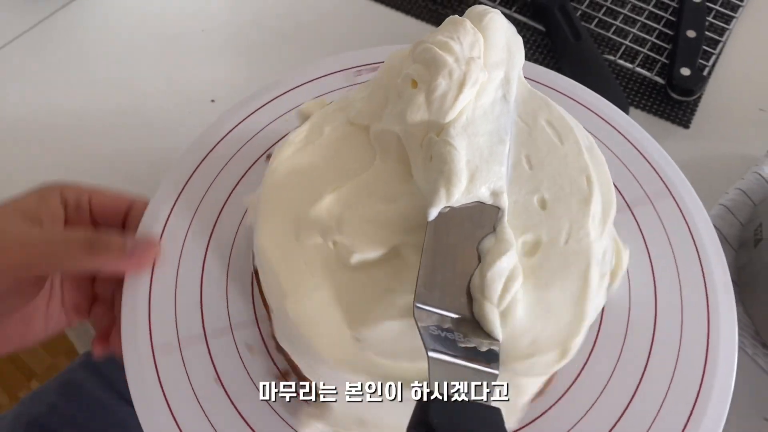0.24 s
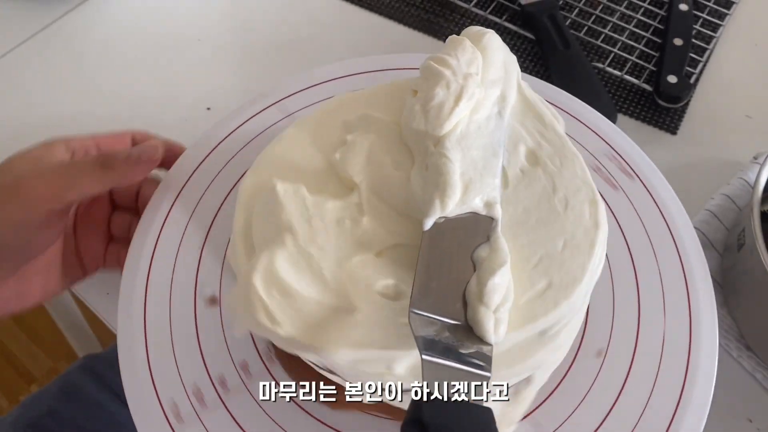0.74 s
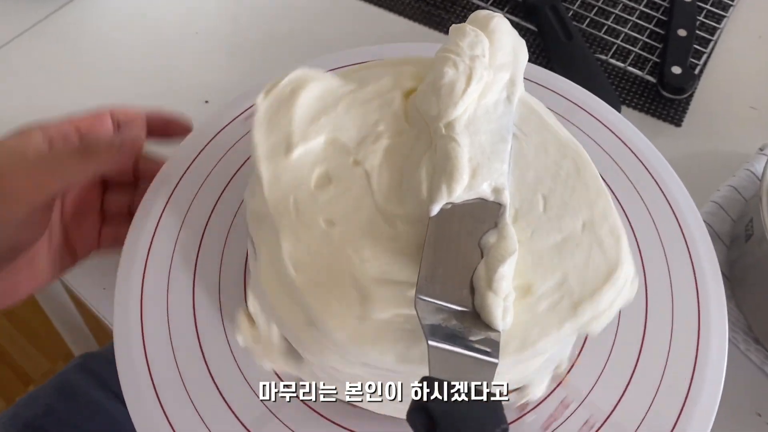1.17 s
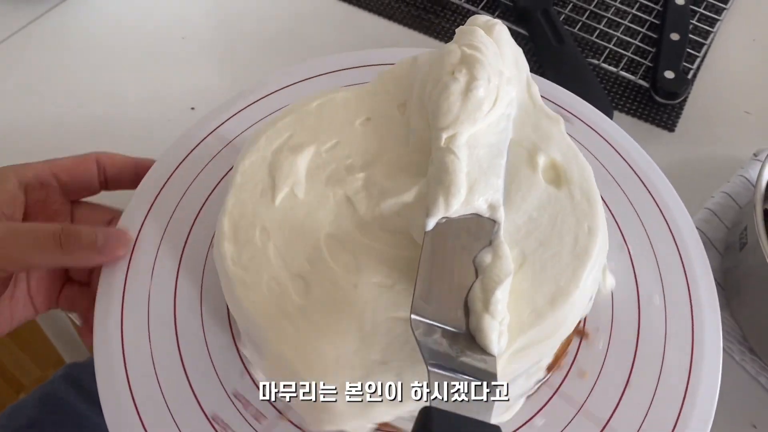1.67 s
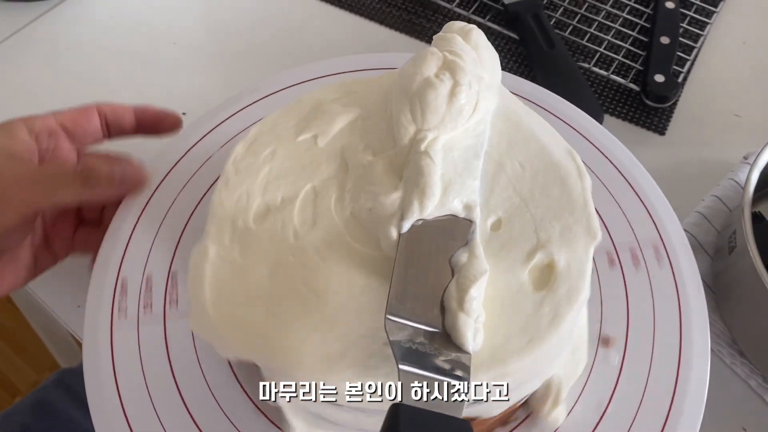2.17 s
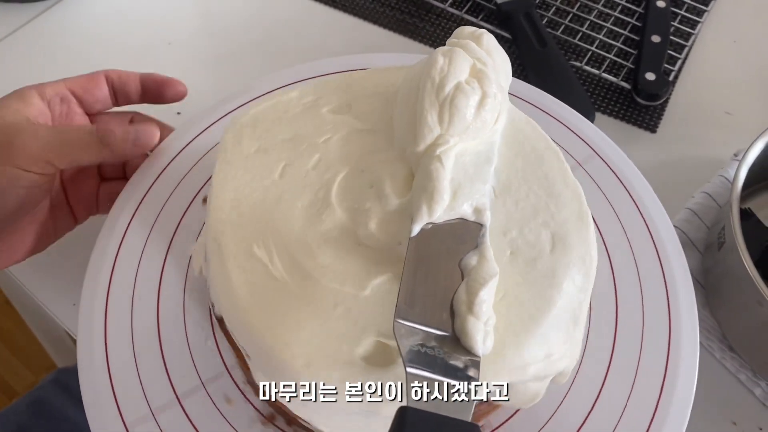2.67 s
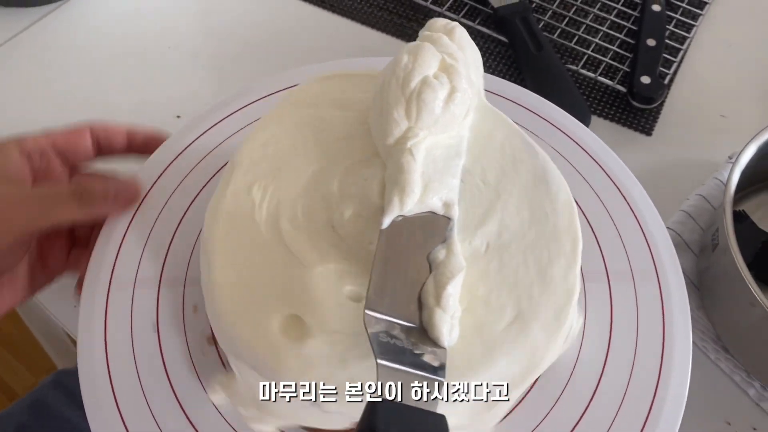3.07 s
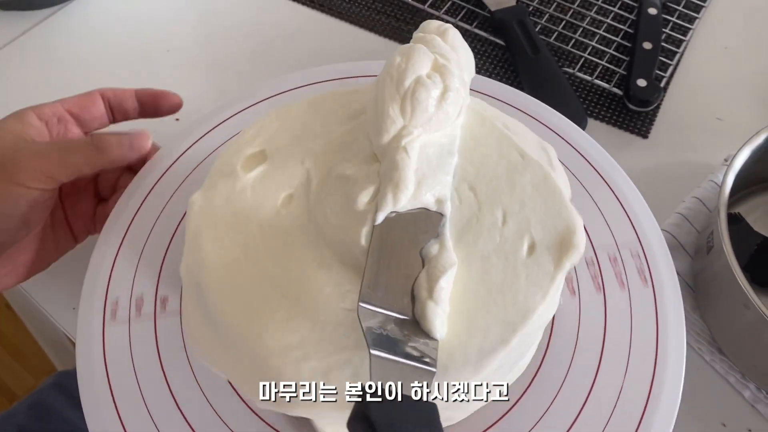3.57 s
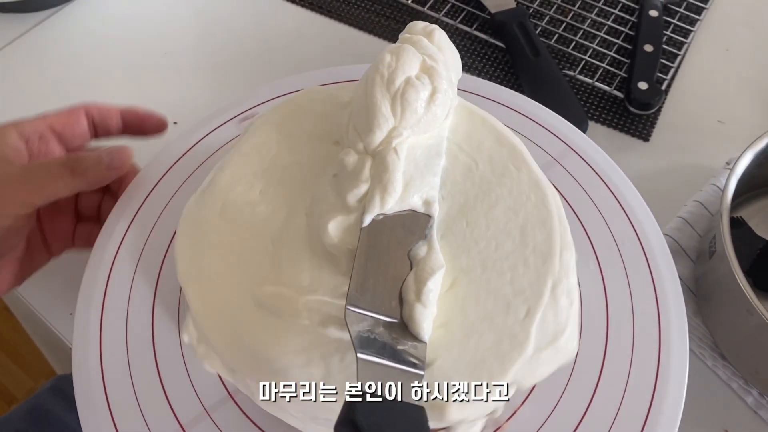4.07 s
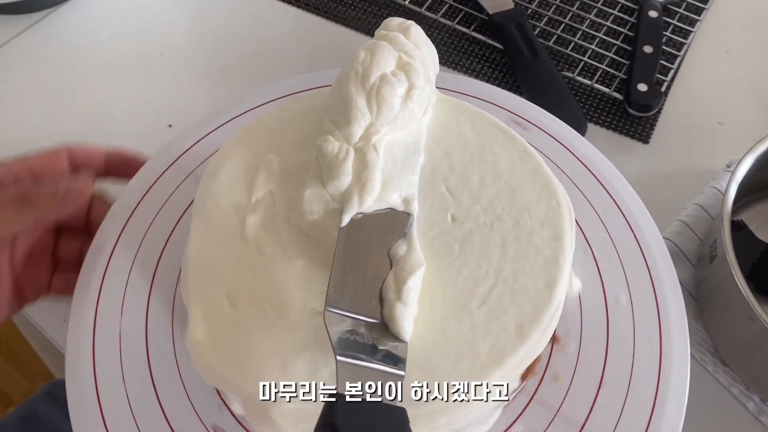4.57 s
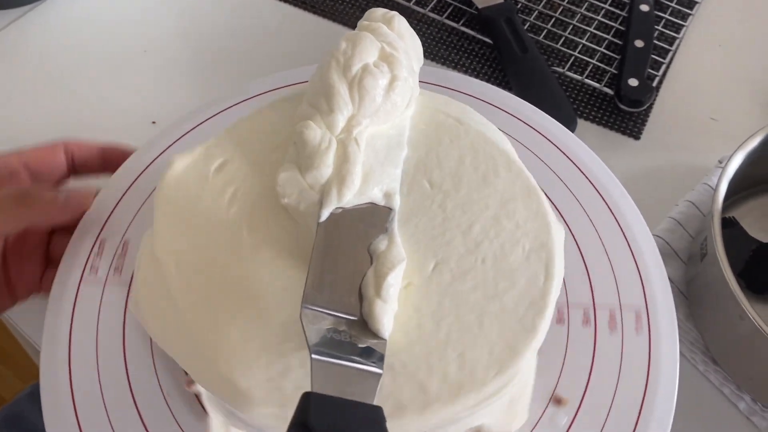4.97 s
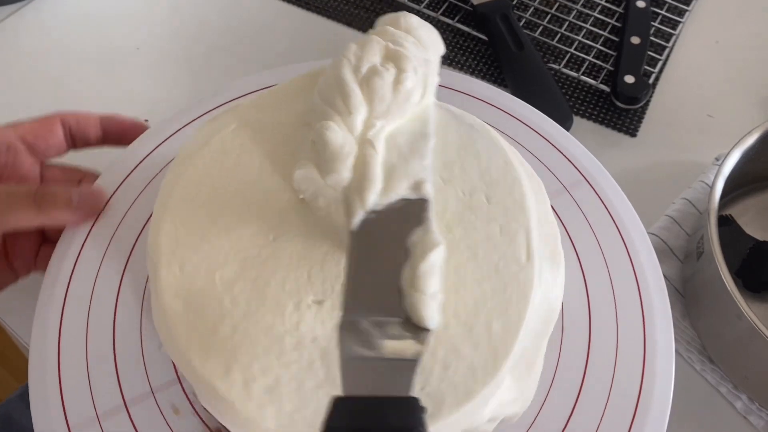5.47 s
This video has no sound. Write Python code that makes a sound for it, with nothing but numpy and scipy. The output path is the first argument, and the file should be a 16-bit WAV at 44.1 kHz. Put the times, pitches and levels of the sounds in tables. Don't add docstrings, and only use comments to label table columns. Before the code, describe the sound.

Wet cream rushes past a blade, then irregular light plastic knocks, nail clicks and dry rubbing as a cake stand is nudged round.

```python
import sys
import numpy as np
from scipy import signal
from scipy.fft import rfft, irfft, next_fast_len
from scipy.io import wavfile
from scipy.ndimage import uniform_filter1d, map_coordinates

SR = 44100
rng = np.random.default_rng(int(sys.argv[2]) if len(sys.argv) > 2 else 0)


def pcm_store(signal):
    levels = np.round(np.clip(np.atleast_2d(signal), -1, 1) * 32767)
    wavfile.write(sys.argv[1], SR, levels.astype(np.int16).T)


def volts(x):
    e = np.asarray(x, float) / 20
    return 10 ** e


N = 253134
STEP = 32
LAND_DB_PER_S, LIFT_DB_PER_S = 2510, 446.5

# pitch_hz, level_db, t60_s (time to die by 60 dB)
PLATTER_MODES = [(384, 0, .08), (454, 0, .08), (497, -3, .04)]
COUNTER_MODES = [(132.6, -2.5, 0.13), (175.3, 10.5, 0.051), (202.3, 5, 0.083), (263.2, 3.5, 0.046)]
RIM_MODES = [(743.4, -9, 0.076), (921, -4, 0.07), (1040, -3, 0.1), (1184, 3.5, 0.077), (1414, -7.5, 0.021),
             (1290, -11, .06)]
SHELL_MODES = [(1548, 4, 0.044), (1575, 1, 0.02), (1897, -3, .035), (2516, 3, 0.017), (3103, -7.5, 0.025),
               (3820, -13.5, 0.037), (4955, -10.5, 0.034)]
PAD_MODES = [(1068, -11, .07), (1420, -7, 0.11), (1870, -1, 0.057), (2390, -6, 0.06), (2970, 3.5, 0.059),
             (3480, -10, .05), (4460, -17, .04), (5028, -7, .06)]

# pitch_hz, level_db (per Hz)
TICK_COLOUR = [(200, -35), (650, 1.5), (1800, -9.5), (3000, -5), (4500, -7.5), (6000, -16), (8000, -15.5),
               (11000, -43)]
SKIN_COLOUR = [(2000, -10.5), (5000, -7.5), (8000, -7), (9000, -4.5), (10400, -2), (13500, -8.5),
               (15200, -9.5), (15700, -23)]
DRAG_COLOUR = [(500, -5), (1000, 17), (2000, 11), (3000, 5), (5200, -3), (6000, -9.5), (7500, -13),
               (9000, -55.5)]
HUM_COLOUR = [(25, -38), (38, -5), (50, 2), (70, -2), (100, -17.5), (200, -40.5), (700, -100)]
AIR_COLOUR = [(180, -17), (300, -5.5), (700, -10.5), (1600, -19), (3500, -23.5), (10500, -28),
              (11500, -38.5), (13000, -47), (15500, -53.5)]
RATTLE_COLOUR = [(250, -35), (550, -6), (800, -2.5), (1300, 0), (2500, -14.5), (5100, -22), (5900, -18),
                 (12000, -35.5)]
RIDGE_COLOUR = [(11200, -30.5), (11900, -2.5), (13800, 1), (15200, -3.5), (15600, -35)]
BUZZ_COLOUR = [(900, -29.5), (1500, 0), (2500, -1.5), (3500, -2), (5200, -4.5), (5600, -20), (7500, -30),
               (9000, -59.5)]

# pitch_hz, width_hz, level_db
BLADE_BANDS = [(1970, 330, 3.5), (1100, 300, -6), (4120, 980, -15)]
EDGE_BANDS = [(2072, 49, 0)]
MURMUR_BANDS = [(128, 35, -1), (173, 35, 2.5), (184.4, 46, 4), (246, 230, -10)]
BODY_BANDS = [(745, 33, 6.5), (973, 150, 10), (1195, 19, 5.5), (1448, 90, 3), (1980, 290, 9),
              (2440, 110, 1.5), (3119, 97, 9), (5000, 500, 0.5)]
SHELL_BANDS = [(1650, 120, 6), (2446, 90, 4.5), (2872, 90, 5), (3466, 80, 9.5), (4140, 110, 4.5),
               (4984, 120, 9)]

# pitch_hz, likeness (0 to 1)
ALIKE = [(30, 0.82), (80, 1), (150, 0.62), (300, 1), (600, 0.36), (1500, 0.2), (4000, 0.45), (6000, 0.22)]
# pitch_hz, t60_s
ECHO_T60 = [(150, 0.28), (500, 0.33), (2000, 0.11), (6000, 0.32), (12000, 0.57)]
# pitch_hz, level_db
LEFT_LEAN = [(100, -1.5), (300, 0.5), (500, 4.5), (1000, -0.5), (1900, 3), (5400, 3.5), (7000, 4.5),
             (8000, -15.5)]

# time_s, level_db
SPIN = [(0.0, -64), (0.19, -67.5), (0.34, -82.5), (0.57, -83), (1.05, -71), (1.34, -71), (1.49, -68.5),
        (1.76, -86.5), (1.92, -82.5), (2.56, -77.5), (3.36, -87), (3.47, -69.5), (3.61, -82), (5.1, -83),
        (5.26, -72), (5.43, -69.5), (5.58, -89), (5.74, -84)]
TREMOR = [(0.0, -71), (0.22, -64), (0.4, -77), (0.82, -68.5), (1.63, -74), (1.74, -56), (1.82, -77.5),
          (2.49, -64), (2.65, -74.5), (3.26, -77.5), (3.37, -58.5), (3.42, -74.5), (3.76, -69),
          (3.79, -78.5), (5.6, -68), (5.74, -73)]

# start_s, length_s, level_db, whistle_db (over the rush)
PLOUGHS = [(0, 0.081, -61, -5), (0.134, 0.19, -65.5, -5), (0.67, 0.14, -79.5, 4), (1.053, 0.065, -72, 1.5),
           (1.522, 0.028, -77.5, -1), (2.463, 0.27, -82.5, 1.5), (4.628, 0.17, -88.5, 4.5),
           (0.336, .14, -87, 2), (2.2, 0.22, -89, 4.5), (2.947, 0.055, -86, 2), (3.581, .12, -84.5, 3.5)]
# start_s, pitch_hz, level_db, t60_s
POP = (1.5272, 5903, -58, .018)
# start_s, length_s, hiss_db, drag_db
GLIDES = [(0.171, 0.14, -70.5, -108), (0.468, 0.016, -80, -82), (0.661, 0.061, -74.5, -75),
          (0.819, 0.092, -65, -49), (0.874, 0.12, -88, -55.5), (1.186, 0.081, -88, -53),
          (1.289, 0.092, -68, -65), (1.466, 0.048, -81.5, -74.5), (1.695, 0.054, -65.5, -74),
          (1.739, .09, -67.5, -65.5), (1.935, 0.048, -101, -71.5), (2.06, 0.034, -75, -60.5),
          (2.144, 0.077, -64.5, -63), (2.418, 0.098, -65.5, -63.5), (2.82, 0.036, -73.5, -73),
          (2.879, 0.048, -71.5, -69.5), (3.015, 0.53, -70, -82), (3.324, 0.12, -62, -65),
          (3.443, 0.033, -72, -63), (3.926, 0.068, -84.5, -90.5), (4.213, .05, -69.5, -69.5),
          (4.772, 0.076, -78.5, -99.5), (5.053, 0.056, -73.5, -74), (5.245, 0.013, -71, -77),
          (5.36, 0.068, -70.5, -70.5), (5.523, 0.042, -81, -82)]
# peak_s, swell_s, hiss_db, drag_db
SWIPES = [(.095, 0.017, -75.5, -81), (0.163, 0.061, -73, -66), (0.309, 0.058, -65.5, -69.5),
          (0.564, 0.076, -58.5, -69.5), (0.708, 0.037, -66, -74), (1.06, 0.095, -79, -68),
          (1.44, 0.071, -75.5, -79), (2.0, 0.053, -75, -63.5), (2.093, 0.063, -59, -71.5),
          (2.635, 0.12, -83, -97), (3.042, 0.051, -76.5, -91.5), (3.125, 0.028, -83, -68),
          (3.17, 0.035, -81.5, -79.5), (3.21, 0.1, -88, -89), (3.299, 0.046, -76, -85),
          (3.434, 0.026, -55, -65), (3.52, 0.21, -77, -73.5), (3.578, 0.036, -58.5, -77),
          (3.83, 0.025, -101, -97.5), (3.894, 0.029, -61, -84), (4.032, 0.034, -75, -75.5),
          (4.296, 0.069, -70, -70), (4.406, 0.06, -72, -84), (4.632, 0.016, -91, -90.5),
          (4.69, .06, -73, -78.5), (4.75, 0.0395, -66, -79), (5.098, 0.039, -72, -81),
          (4.85, 0.04, -84, -93.5), (5.15, 0.08, -89, -103), (5.203, 0.047, -77.5, -100)]
# start_s, level_db, low_mode_db (over the rest)
BUMPS = [
    (.08, -63, 0),
    (.31, -54.5, 7),
    (1.055, -51, -5),
    (2.565, -63, 4.5),
    (2.821, -67, -5),
    (3.491, -58.5, -2),
    (3.875, -72.5, -3.5),
    (3.946, -60, -1.5),
    (4.013, -47.5, -7),
    (5.085, -48, -13.5),
]
# start_s, length_s, level_db
SKIMS = [(0.084, 0.28, -85), (0.478, 0.27, -79), (1.036, 0.047, -83), (1.293, 0.074, -73),
         (1.41, 0.11, -87), (1.96, 0.22, -82), (2.59, 0.083, -83.5), (2.803, 0.11, -84),
         (3.006, 0.12, -79.5), (3.283, 0.013, -92), (3.33, .3, -83), (3.875, 0.18, -86.5),
         (3.955, 0.0063, -87), (4.224, .21, -83), (4.63, 0.25, -84), (5.036, .17, -84), (5.356, .08, -85.5)]
# start_s, pitch_hz, level_db, t60_s
ACCENTS = [(.815, 743, -45, 0.14), (0.81, 1580, -35.5, 0.088), (0.814, 2600, -31, 0.043),
           (.815, 1603, -41.5, .05), (.815, 3537, -42, .027), (.88, 4100, -54, 0.033),
           (1.28, 4130, -39, 0.033), (1.2813, 4000, -44, .02), (1.8, 640, -54, 0.023),
           (1.681, 750, -48, 0.062), (1.681, 1000, -58, 0.043), (2.0248, 3600, -48, .012),
           (2.0245, 2000, -50, .015), (2.05, 2500, -63, .03), (2.063, 2000, -53, .03),
           (2.419, 910, -55.5, 0.083), (2.439, 700, -60, .04), (3.11, 1100, -63, .04),
           (3.895, 1000, -63, .05), (5.524, 1012, -52, 0.046), (5.06, 1190, -66.5, 0.064),
           (5.09, 1020, -65, .05), (4.745, 1060, -68, .05), (2.79, 226, -64, .08), (0.48, 1050, -54, 0.031),
           (0.15, 1230, -56, .05), (.176, 4100, -62, .03), (.503, 1980, -56, .03), (.523, 4000, -58, 0.033),
           (.523, 1900, -58, .03), (0.63, 950, -64, .07), (3.32, 1580, -50, .04), (3.03, 1000, -72, .09),
           (1.745, 3300, -54, .02), (2.147, 2100, -48, 0.028)]
# start_s, level_db
PADS = [
    (1.183, -44.5),
    (1.938, -52.5),
    (2.78, -55),
]
# start_s, length_s, level_db, low_mode_db (over the high one)
GRINDS = [
    (0.175, 0.18, -66.5, 0.5),
    (.51, 0.065, -67.5, -3),
    (2.442, 0.16, -71.5, 6.5),
    (2.874, 0.073, -68, -3),
    (3.003, 0.17, -79.5, -8.5),
    (3.34, 0.27, -65, 0.5),
    (4.234, 0.091, -65, -2),
    (4.67, 0.19, -75.5, 3),
    (5.057, 0.1, -72, 2),
]
# start_s, peak_db
SNAPS = [(0.176, -55.5), (0.347, -76), (0.5025, -57), (0.656, -64), (0.815, -40.5), (0.8784, -49),
         (1.1819, -54.5), (1.281, -48.5), (1.4819, -69.5), (1.6806, -48), (1.7449, -46.5), (1.938, -60),
         (2.0239, -52), (2.0469, -59), (2.147, -46), (2.417, -50.5), (2.4402, -61), (2.781, -71.5),
         (2.8602, -52), (3.318, -43.5), (3.6214, -74.5), (3.9548, -79.5), (4.2125, -52.5), (5.032, -74.5),
         (5.2433, -69), (5.3506, -52.5), (5.527, -65)]
# platter_db, thud_db, rim_db
FIRM = [(0.1765, -45.5, 1.5, 0, -6), (0.5035, -44, -8, -22, -12), (0.8144, -26.5, 4.5, -19, 3),
        (0.88, -37, -31.5, -10, -8.5), (1.1841, -35, -1.5, -13, 0), (1.2795, -31.5, -7.5, -17, -25),
        (1.68, -37.5, 0, -5, -11.5), (1.7216, -57.5, 5, -9, 6), (1.7447, -35.5, -14.5, -18, -14.5),
        (1.939, -42.5, 2, -19, 2), (2.0245, -39, 4, -8, -8.5), (2.1462, -44, -2.5, -15, -7.5),
        (2.4172, -44.5, 1.5, -1, -11.5), (2.4377, -52.5, 2, -3, 0.5), (2.78, -52.5, 9.5, -10, 5.5),
        (2.8597, -40, -5, -19, -11.5), (3.318, -39.5, 1, -5, -6), (3.3653, -47, -13.5, -7, -8),
        (4.0153, -67.5, 6.5, -6, 7), (4.2131, -38.5, -0.5, -14, -8), (5.056, -54.5, -2, -9, -6),
        (5.2436, -49.5, -2.5, -8, -7.5), (5.3476, -41.5, -2.5, -8, -10.5), (5.5252, -59, 2, -1, -5)]
FIRM_LOW_DB = [-5.5, 1, -1, -3, 4.5, -1.5, -2, -1.5, -2.5, -7, -4, -0.5, 0.5, 3.5, -11.5, -1, 3.5, -12, 2.5,
               -6.5, -0.5, 1, 4.5, 6.5]
# platter_db, rim_db
LIGHT = [(0.3456, -61, -24, -27), (0.471, -64, -8, -1), (0.5234, -51.5, -29, -6.5),
         (0.6553, -61.5, -7.5, -31), (1.4795, -57.5, 1, -23.5), (1.5259, -73, -18.5, -22),
         (2.0503, -45, 0, -14), (3.1079, -62.5, -1, -2), (3.1339, -59.5, -10.5, -6.5),
         (3.6177, -61.5, -19.5, -28.5), (4.158, -71.5, -18, -17.5), (4.022, -77, -9, -5.5),
         (4.285, -69, -12.5, -7), (4.293, -60, -4, -4.5), (1.0751, -66, 0, -14), (0.7985, -62.5, -11, -2.5),
         (4.544, -75, -22, -18), (4.6749, -65, 2, -2), (5.031, -77, -4, 2)]
# start_s, length_s, level_db
BUZZES = [(0.813, .17, -59), (1.19, 0.084, -61.5), (1.286, 0.12, -72), (1.677, .06, -76),
          (1.748, 0.093, -70), (1.94, 0.073, -75), (2.034, 0.12, -75), (2.15, 0.06, -75),
          (2.425, 0.08, -76.5), (2.778, 0.059, -81), (2.864, .07, -75), (3.11, .2, -77),
          (3.324, 0.3, -65.5), (4.216, .1, -75.5), (5.349, 0.098, -73.5)]
# time_s, pitch_hz, level_db
SQUEAK = [
    (3.115, 7380, -100),
    (3.135, 7430, -85),
    (3.165, 7560, -83),
    (3.195, 7740, -87),
    (3.21, 7800, -100),
]


def unit(x):
    return x / np.sqrt(np.mean(x ** 2) + 1e-20)


def along(points, hz):
    f, v = np.transpose(points)
    return np.interp(np.log(hz + 1), np.log(f + 1), v)


def coloured(points):
    return lambda hz: volts(along(points, hz))


def curves(rows):
    s, *cols = np.transpose(rows)
    return [np.interp(np.arange(N) / SR, s, c) for c in cols]


def wobble(rate):
    knots = rng.standard_normal(int(N / SR * 200) + 4)
    return map_coordinates(knots, [np.arange(N) * rate / SR])


def filtered(x, response):
    m = next_fast_len(x.shape[-1] + 8192)
    return irfft(rfft(x, m) * response(np.fft.rfftfreq(m, 1 / SR)), m)[..., :x.shape[-1]]


def resonances(bands):
    def response(f):
        return sum((-1) ** k * volts(db) * 1j * f * width / (c * c - f * f + 1j * f * width)
                   for k, (c, width, db) in enumerate(bands))
    return response


def muffled(bands):
    return lambda hz: resonances(bands)(hz) / (1 + (hz / 1800) ** 2)


def through_body(points, bands=BODY_BANDS):
    return lambda hz: volts(along(points, hz)) * np.sqrt(1 + np.abs(resonances(bands)(hz)) ** 2)


def spread(pair, colour):
    def response(hz):
        turn = np.arccos(np.clip(along(ALIKE, hz), -1, 1)) / 2
        return colour(hz) * np.array([np.cos(turn), np.sin(turn)])
    mid, side = filtered(pair, response)
    return unit(np.array([mid + side, mid - side]))


def grainy(rate, depth_db, patchy_db):
    z = signal.stft(rng.standard_normal((2, N)), nperseg=256)[2]
    field = uniform_filter1d(rng.standard_normal(z.shape[1:]), size=3, axis=0)
    field = uniform_filter1d(field, size=10, axis=1)
    noise = signal.istft(z * volts(patchy_db * unit(field)), nperseg=256)[1][:, :N]
    return volts(depth_db * wobble(rate)) * noise


def ring(modes, t, cycles, scatter_db, turn):
    out = np.zeros((2, len(t)))
    for hz, db, t60 in modes:
        size_db, detune, lean = rng.standard_normal(3)
        phase = 2 * np.pi * hz * (1 + detune / 150) * t + turn * lean * np.array([[1], [-1]])
        swell = 1 - np.exp(-(t * hz / cycles) ** 2)
        out += volts(db + scatter_db * size_db - 60 * t / t60) * np.sin(phase) * swell
    return out


def burst(colour, t60_s, rise_s, size):
    t = np.arange(SR // 8) / SR
    shape = volts(-60 * t / t60_s) * (1 - np.exp(-t / rise_s))
    puff = spread(rng.standard_normal((2, len(t))) * shape, colour)
    return np.pad(puff / np.abs(puff).max(), ((0, 0), (0, size - len(t))))


def place(out, start_s, sound):
    out[:, round(start_s * SR):][:, :sound.shape[1]] += sound


def held(start, length, rise_db_per_s, sag_db_per_s, fall_db_per_s):
    t = np.arange(0, N + STEP, STEP) / SR - start
    rise = rise_db_per_s * np.minimum(t, 0)
    sag = sag_db_per_s * np.clip(t, 0, length)
    return rise - sag - fall_db_per_s * np.maximum(t - length, 0)


def summed(levels_db):
    gain = sum(map(volts, levels_db))
    return np.interp(np.arange(N) / STEP, np.arange(len(gain)), gain)


def contacts():
    firm = [(*row, low_db) for row, low_db in zip(FIRM, FIRM_LOW_DB)]
    light = [(s, db, platter_db, -10, rim_db, 0) for s, db, platter_db, rim_db in LIGHT]
    return sorted(firm + light)


def kitchen():
    spin_db, = curves(SPIN)
    tremor_db, = curves(TREMOR)
    shake = summed(db + thud_db - 21.5 + held(s, 0, LAND_DB_PER_S, 0, 60 / 0.89)
                   for s, db, _, thud_db, *_ in contacts())
    stir = volts(-72.5 + 0.31 * (spin_db - spin_db.mean())) + shake
    hum = volts(0.3 + tremor_db) * spread(grainy(6, 3, 1), coloured(HUM_COLOUR))
    murmur = volts(3) * stir * spread(grainy(8, 4, 2), muffled(MURMUR_BANDS))
    air = volts(-81) * spread(grainy(3.0, 0.18, 0.29), coloured(AIR_COLOUR))
    return hum + murmur + air


def spatula():
    strokes = [db + held(s, length, 295, 53, 295) for s, length, db, _ in PLOUGHS]
    whistles = [stroke + row[3] - 3.5 for stroke, row in zip(strokes, PLOUGHS)]
    wet = lambda hz: resonances(BLADE_BANDS)(hz) / (1 + (hz / 7000) ** 4)
    rush = summed(strokes) * spread(grainy(70, 1.2, 1.5), wet)
    edge = summed(whistles) * spread(grainy(50, 2.5, 1.1), muffled(EDGE_BANDS))
    s, hz, db, t60 = POP
    pop = ring([(hz, db, t60)], np.maximum(np.arange(N) / SR - s, 0), 1.5, 0, .2)
    return rush + edge + pop


def rubbing(sag_db_per_s, column):
    levels = [row[column] + held(row[0], row[1], LAND_DB_PER_S, sag_db_per_s, LIFT_DB_PER_S)
              for row in GLIDES]
    for row in SWIPES:
        swell_db_per_s = 18 / row[1]
        fade_db_per_s = swell_db_per_s / 0.44
        levels.append(row[column] + held(row[0], 0, swell_db_per_s, 0, fade_db_per_s))
    return uniform_filter1d(summed(levels), size=200)


def sliding():
    hiss = spread(grainy(90, 1.8, 2.2), coloured(SKIN_COLOUR))
    drag = spread(grainy(120, 1.2, 1.8), through_body(DRAG_COLOUR))
    bearing_bands = [(432.0, 16, 0.0), (494, 50, -11.5), (315, 43, 0.5)]  # pitch_hz, width_hz, level_db
    bearing = spread(grainy(35, 1.0, 0.2), muffled(bearing_bands))
    skin = rubbing(87.5, column=2)
    scratch = rubbing(135.5, column=3)
    pushed = volts(-2.5) * uniform_filter1d(skin, size=2000)
    turning = volts(curves(SPIN)[0] - 3.0)
    return volts(-1.0) * skin * hiss + volts(1.5) * scratch * drag + (turning + pushed) * bearing


def bumps():
    out, t = np.zeros((2, N + SR)), np.arange(SR // 4) / SR
    for s, db, low_db in BUMPS:
        low = ring(PLATTER_MODES[:1], t, cycles=4, scatter_db=1.5, turn=.15)
        high = ring(PLATTER_MODES[1:], t, cycles=4, scatter_db=1.5, turn=.15)
        place(out, s, volts(db + 5) * (volts(low_db) * low + high))
    return out[:, :N]


def skims():
    gain = summed(db + held(s, length, 706, 13, 706) for s, length, db in SKIMS)
    return gain * spread(grainy(25, 3.2, 2.6), coloured(RIDGE_COLOUR))


def accents():
    out, t = np.zeros((2, N + SR)), np.arange(SR // 5) / SR
    strikes = [(s, db, PAD_MODES) for s, db in PADS]
    strikes += [(s, db, [(hz, 0, t60)]) for s, hz, db, t60 in ACCENTS]
    for s, db, modes in strikes:
        place(out, s, volts(db) * ring(modes, t, 5.1, 1.2, 0.5))
    return out[:, :N]


def grinding():
    levels = [db + held(s, length, 500, 34, 500) for s, length, db, _ in GRINDS]
    low_levels = [level + row[3] for level, row in zip(levels, GRINDS)]
    low = summed(low_levels) * spread(grainy(24.93, 2.5, .3), muffled([(384.4, 12, 0)]))
    high = summed(levels) * spread(grainy(25, 1.8, .3), muffled([(451, 11, 0)]))
    return low + high


def snaps():
    out = np.zeros((2, N + SR))
    for s, db in SNAPS:
        place(out, s, volts(db + 8.0) * burst(coloured(SKIN_COLOUR), 0.032, 0.00023, size=SR // 8))
    return out[:, :N]


def touches():
    out, t = np.zeros((2, N + SR)), np.arange(SR // 2) / SR
    for s, db, high_db, thud_db, rim_db, extra_db in contacts():
        low_db = high_db - 4 + 0.14 * rim_db + extra_db
        soft = np.clip((rim_db + 13.5) / 17, 0, 1)

        def tick_colour(hz):
            dulling_db = 7.3 * soft * np.log2(1 + hz / 3000)
            pad_cut_db = 18 * soft * (hz > 5500)
            return volts(along(TICK_COLOUR, hz) - dulling_db - pad_cut_db)

        tick = burst(tick_colour, 0.018 + 0.058 * soft, 0.0002 + .0015 * soft, size=len(t))
        tick = tick * (1 + 1.4 * (1 - soft) * volts(-60 * t / 0.0061))
        rattle = volts(rim_db + 0.5) * burst(through_body(RATTLE_COLOUR), 0.039, 0.00053, size=len(t))
        shell = volts(18 * soft - 22.0) * ring(SHELL_MODES, t, 6.9, 1.6, 1.0)
        bell = shell + volts(rim_db - 4) * ring(RIM_MODES, t, 2.1, 1.3, 0.46)
        late = np.maximum(t + .001 - .0038 * soft ** 2, 0)
        low = ring(PLATTER_MODES[:1], late, 1.9, 0, .12)
        high = ring(PLATTER_MODES[1:], late, 1.9, 0, .12)
        thud = ring(COUNTER_MODES, late, cycles=1.8, scatter_db=2, turn=.05)
        boom = volts(low_db + 13.0) * low - volts(high_db + 7.0) * high + volts(thud_db + 9.5) * thud
        sent = volts(-6.5) * tick + volts(0.5) * rattle + volts(-22.5) * bell + volts(-9) * boom
        echo = room(sent[0, :SR // 8])
        place(out, s, volts(db) * (volts(-0.5) * tick + rattle + bell + boom + echo))
    return out[:, :N]


def room(x):
    hz, t, z = signal.stft(rng.standard_normal((2, SR // 2)), SR, nperseg=256)
    fade = volts(-60 * t / along(ECHO_T60, hz)[:, None])
    tail = signal.istft(z * fade, SR, nperseg=256)[1][:, :SR // 2]
    tail = spread(tail, np.ones_like)
    tail = np.pad(tail / np.linalg.norm(tail[0]), ((0, 0), (220, 0)))
    return signal.fftconvolve(x[None], tail, axes=1)[:, :SR // 2]


def buzzing():
    gain = summed(db + held(s, length, LAND_DB_PER_S, 70, 400) for s, length, db in BUZZES)
    return gain * spread(grainy(110, 1.6, 2.4), through_body(BUZZ_COLOUR, SHELL_BANDS))


def squeak():
    hz, db = curves(SQUEAK)
    phase = 2 * np.pi * np.cumsum(hz * (1 + .007 * wobble(150))) / SR
    tone = np.sin(phase) + .6 * np.sin(2 * phase)
    return volts(db + 5 + 4 * wobble(80)) * tone * (db > -99)


def scene():
    background = kitchen() + spatula()
    rubs = sliding() + bumps() + skims()
    knocks = accents() + grinding() + snaps() + touches()
    return background + rubs + knocks + buzzing() + squeak()


def band_limit(x):
    return signal.sosfilt(signal.butter(12, 16510, fs=SR, output="sos"), x)


def record(dry):
    side = np.array([[1], [-1]])
    lead_s = 2.5e-5
    upper = lambda hz: np.clip((hz - 6800) / 1500, 0, 1)
    treble = lambda hz: np.sqrt(upper(hz)) * (hz < 16500)

    def low_response(hz):
        lean = volts(side * along(LEFT_LEAN, hz) / 2)
        return np.sqrt(1 - upper(hz)) * lean * np.exp(1j * np.pi * side * hz * lead_s)

    late = lambda hz: np.exp(-1j * side * np.pi * (hz - 10150) / 3900)
    lows = filtered(dry, low_response)
    apart = filtered(.22 * side * np.roll(dry[1], 60), treble)
    shared = filtered(dry[0], lambda hz: treble(hz) * late(hz))
    return band_limit(lows + apart + shared)


dry = scene()
out = record(dry)
pcm_store(out)
```